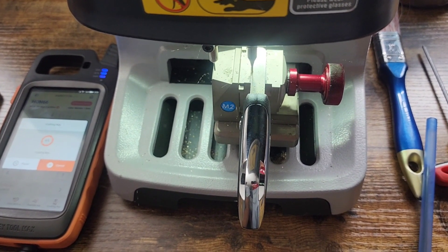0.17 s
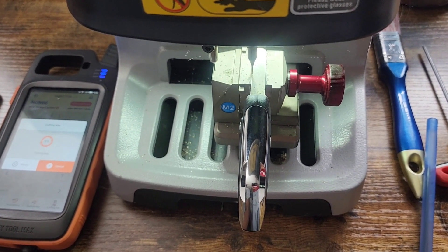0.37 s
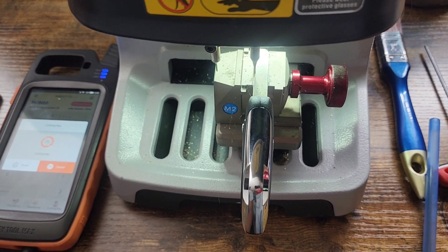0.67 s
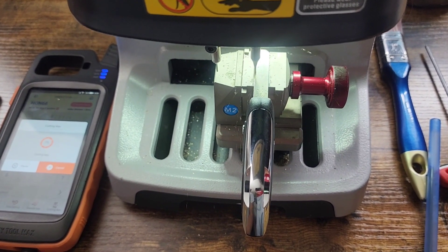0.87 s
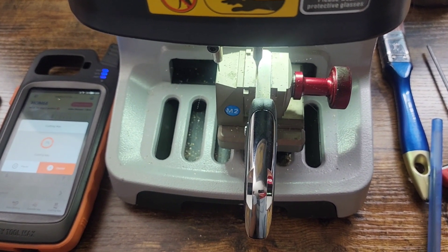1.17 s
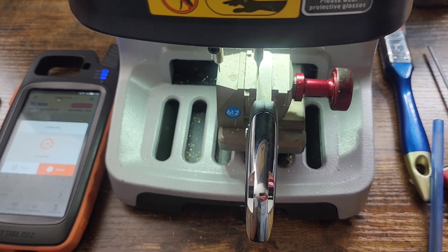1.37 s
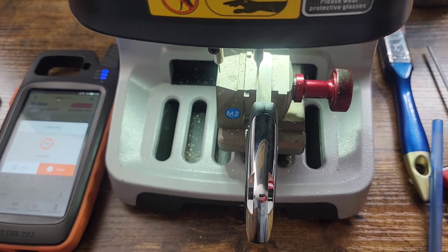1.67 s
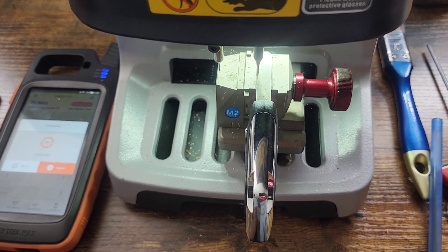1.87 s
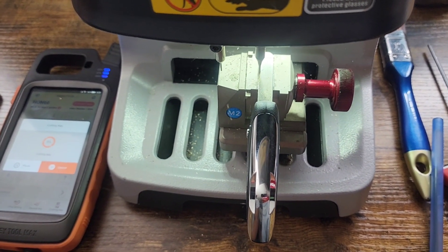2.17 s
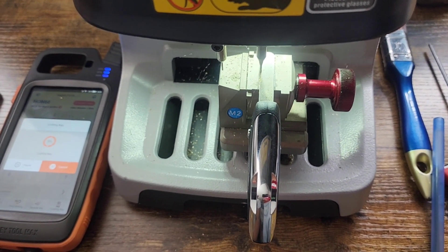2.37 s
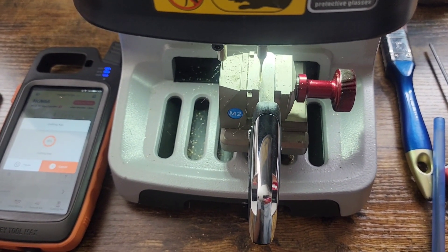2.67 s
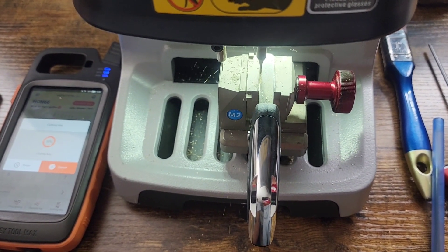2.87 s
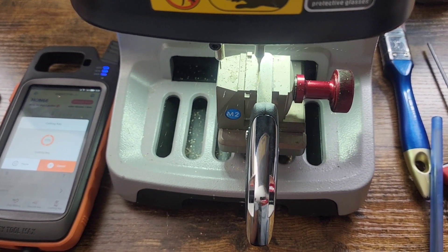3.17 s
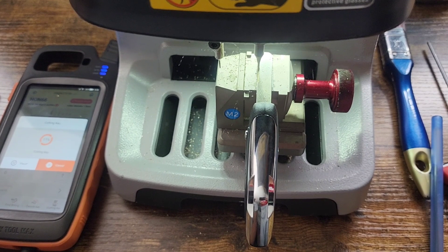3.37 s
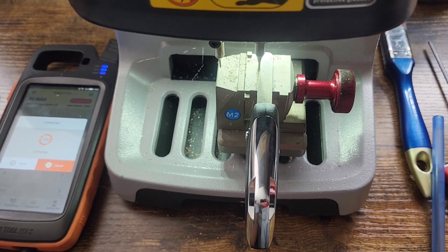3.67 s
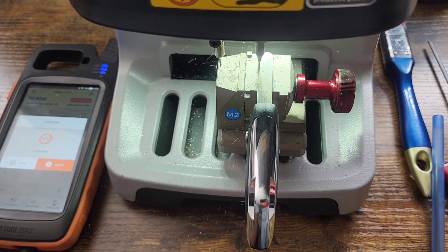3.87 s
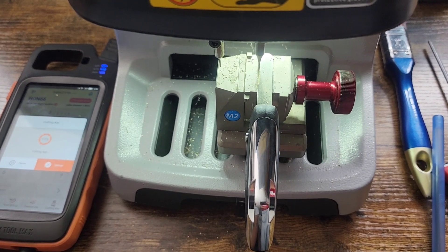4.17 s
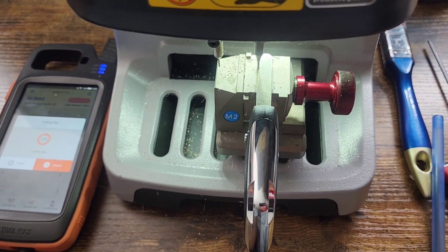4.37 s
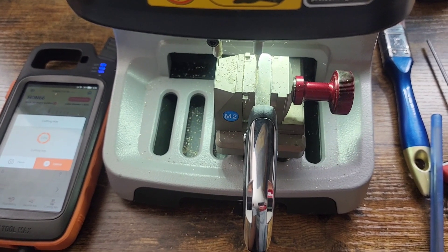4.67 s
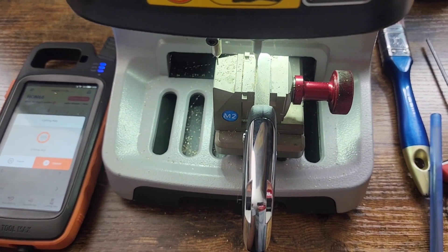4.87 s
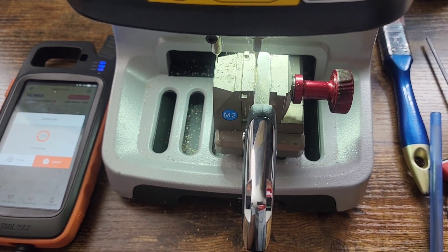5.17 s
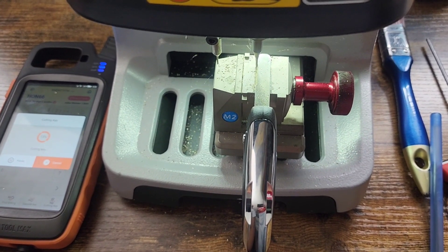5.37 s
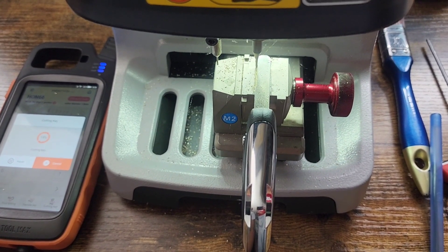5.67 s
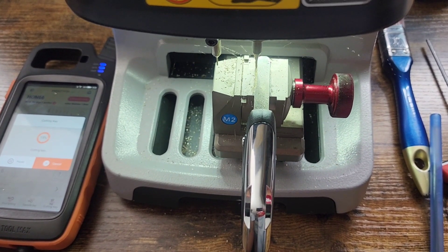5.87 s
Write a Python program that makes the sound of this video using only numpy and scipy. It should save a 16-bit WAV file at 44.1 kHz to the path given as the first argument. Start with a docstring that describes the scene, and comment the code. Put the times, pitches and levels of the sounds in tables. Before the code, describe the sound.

A small key cutting machine runs close by on a desk indoors. Its spindle hums steadily over a low rumble, with rattling bearings, a faint motor buzz and the gritty scrape of a cutter on a metal blank. A thin high whine soon rises. Near the middle the main tone drops out for an instant and the blank rings briefly, then the cutting carries on, easing before it bites again.

```python
"""A small key cutting machine mills a metal blank on a desk, heard from close by.
From the start the spindle hums at about 200 turns a second, its bearings rattle, the carriage motor
buzzes and three flutes scrape off chips. At 0.75 s the thin whine of the drive comes up, and the cut
then deepens. Near 2.75 s the flutes lose grip: their tone drops out, and the blank rings as they catch.
Around 5 s the drive runs almost free, before the cutter bites again."""
import sys
import numpy as np
from scipy.fft import rfft, irfft, next_fast_len
from scipy.io import wavfile
from scipy.ndimage import map_coordinates

SR = 44100
rng = np.random.default_rng(int(sys.argv[2]) if len(sys.argv) > 2 else 0)


def digitize_waveform(pressure):
    """Quantize a signal to 16-bit integers and store it at the path in sys.argv[1].

    Rows of a 2-D input are taken as channels; values are limited to [-1, 1].
    """
    field = np.atleast_2d(pressure).T
    bounded = np.clip(field, -1, 1)
    quanta = np.round(bounded * 32767).astype(np.int16)
    wavfile.write(sys.argv[1], SR, quanta)


N = 265790
TIME = np.arange(N) / SR
FLUTES = 3
SLIP_S, SLIP_WIDTH_S = 2.747, .024  # the flutes lose their grip


def amp(db):
    """Amplitude ratio of a level in decibels."""
    return 10 ** (np.asarray(db) / 20)


def unit(x):
    """Normalisation to an rms of 1."""
    return x / np.sqrt(np.mean(x ** 2) + 1e-20)


def curve(rows):
    """Linear interpolation of (time, value) rows, one value per sample."""
    return np.interp(TIME, *np.transpose(rows))


def bump(centre_s, width_s):
    """Gaussian pulse of height 1."""
    return np.exp(-((TIME - centre_s) / width_s) ** 2)


def wobble(rate_hz):
    """Slow random modulation: a spline through rate_hz Gaussian knots a second."""
    knots = rng.standard_normal(int(N * rate_hz / SR) + 4)
    coarse_s = TIME[::32]
    return np.interp(TIME, coarse_s, map_coordinates(knots, [coarse_s * rate_hz]))


def angle(hz):
    """Phase as the time integral of frequency."""
    return 2 * np.pi * np.cumsum(hz) / SR


def filtered(x, response):
    """Linear filtering: the spectrum is multiplied by a frequency response."""
    size = next_fast_len(N + SR // 4)
    return irfft(rfft(x, size) * response(np.fft.rfftfreq(size, 1 / SR)), size)[..., :N]


def tone(phase, left_db, right_db, correlation=.85):
    """Interference: reflections from the desk put a partial out of step in the two channels."""
    offset = np.arccos(np.clip(correlation, -1, 1)) / 2
    phase = phase + rng.uniform(0, 2 * np.pi) + np.array([[offset], [-offset]])
    return np.sqrt(2) * amp([[left_db], [right_db]]) * np.sin(phase)


def slipping_tone(phase, left_db, right_db, slip_rad, flutter_db):
    """Random phase and amplitude modulation: the tone of a slipping source wanders and flutters."""
    flutter = unit(amp(flutter_db * (.45 * wobble(7) + wobble(45))))
    wander = slip_rad * (wobble(9) + .5 * wobble(55))
    return flutter * tone(phase + wander, left_db, right_db)


def noise_band(spectrum, low_hz, high_hz, coherent_hz):
    """Partial coherence: band-limited noise whose two channels are alike below coherent_hz."""
    knots_hz, *channels_db = np.transpose(spectrum)

    def mid_and_side(hz):
        spread = np.pi / 4 * (1 - 1 / (1 + (hz / coherent_hz) ** 2))
        return np.array([np.cos(spread), np.sin(spread)])

    def colour(hz):
        density = amp([np.interp(np.log(hz + 1), np.log(knots_hz), db) for db in channels_db])
        high_pass = (1 + (low_hz / (hz + 1)) ** 12) ** -.5
        low_pass = (1 + (hz / high_hz) ** 12) ** -.5
        return density * high_pass * low_pass

    mid, side = filtered(rng.standard_normal((2, N)), mid_and_side)
    return np.sqrt(SR / 2) * filtered(np.array([mid + side, mid - side]), colour)


# Overtones of the carriage motor: harmonic_number, left_db, right_db
STEP_HARMONICS = [(3, -63, -59), (4, -66, -58), (5, -63, -50), (6, -73, -67), (7, -78, -64), (8, -82, -72)]
def carriage_motor(step_hz=926):
    """Periodic stepping: the motor buzzes faintly at harmonics of its step rate."""
    return sum(slipping_tone(2 * np.pi * k * step_hz * TIME, left_db, right_db, slip_rad=.3, flutter_db=1.5)
               for k, left_db, right_db in STEP_HARMONICS)


# Resonances of the frame on the desk: centre_hz, width_hz, relative_db
FRAME_MODES = [(54.6, 6.3, -47.5), (166.7, 6, -58), (226, 6, -46.5), (242.6, 12, -52), (268, 20, -46.5)]
def frame(load, drone_hz=111):
    """Forced vibration: the feed shakes the frame's low modes; one drones and swells in the deepest cut."""
    shake = np.zeros(N)
    for hz, width_hz, db in FRAME_MODES:
        envelope = wobble(width_hz) + 1j * wobble(width_hz)
        shake += amp(db) * unit(np.real(envelope * np.exp(2j * np.pi * hz * TIME)))
    drone_db = -48 - 3.5 * load + 5 * bump(3.77, .49) + 2 * wobble(8.7)
    drone = unit(np.sin(2 * np.pi * drone_hz * TIME + .99 * wobble(14)))
    return amp(-1.5) * shake + amp(drone_db) * drone


# Spectral density of the housing's rumble: frequency_hz, left_relative_db, right_relative_db
RUMBLE_SPECTRUM = [(19.9, -90, -93), (40, -77.5, -84), (81, -64.5, -67.5), (155, -84.5, -67),
                   (219, -60, -61), (260, -61.5, -75), (322, -63, -63.5), (361, -75, -69.5),
                   (617, -60, -81), (754, -78, -69.5), (1120, -79.5, -71)]
def housing():
    """Random vibration: the housing radiates a low band of noise."""
    return amp(-1.5) * noise_band(RUMBLE_SPECTRUM, low_hz=22.1, high_hz=1060, coherent_hz=520)


def drive(load, free_hz=4958, climb_hz=109, casing_hz=5030, half_width_hz=46):
    """Band-pass transmission: the whine climbs with load and passes the casing best in one narrow band."""
    pitch_hz = free_hz + climb_hz * load + wobble(20)
    off_band = 1 - 1 / (1 + ((pitch_hz - casing_hz) / half_width_hz) ** 6)
    soft_start = .5 - .5 * np.tanh((TIME - .75) / .033)
    gain_db = -14 * off_band - 5.5 * soft_start + .4 * wobble(30)
    return amp(gain_db) * tone(angle(pitch_hz), left_db=-52.5, right_db=-33, correlation=0)


# Bearing tones: shaft_multiple, left_db, right_db, full_bite_change_db, slip_rad
BEARING_TONES = [(1.496, -42.5, -45.5, 0, 0.69), (2.42, -61, -51, -3, 0.66), (2.532, -50.5, -45, -17, 0.55),
                 (3.54, -43.5, -44.5, -8.5, 1.3), (4.168, -58, -69, 3.5, 0.88), (4.54, -51.5, -67, 1, 1.25),
                 (5.54, -53.5, -47, -8.5, 1.1), (6.51, -57, -51, -13, 0.62), (7.52, -57, -62, -15, 0.44),
                 (12.56, -48, -48.5, -2.5, 1.17), (12.82, -52.5, -55, 0.5, 1.55),
                 (12.94, -53, -51.5, -7, 1.43), (13.65, -59, -58, 2.5, 0.91), (18.87, -57, -48, 3, 0.28),
                 (31.9, -72, -58, 4.5, 0.92)]
def bearing_rattle(shaft, bite):
    """Inharmonic partials: the balls roll and slip at non-integer multiples of the shaft rate."""
    return sum(amp(bite_db * bite) * slipping_tone(k * shaft, left_db, right_db, slip, flutter_db=2.5 * slip)
               for k, left_db, right_db, bite_db, slip in BEARING_TONES)


# Bouts in which one bearing tone sings out: start_s, length_s, relative_db
SINGING_BOUTS = [(0.049, 0.096, -49), (0.406, 0.169, -50), (0.743, 0.39, -49), (1.538, 0.3, -47.5),
                 (2.17, 0.169, -47.5), (2.485, 0.25, -49), (2.948, 0.83, -50), (3.84, 0.23, -49.5),
                 (4.19, 0.087, -48), (4.451, 0.127, -48), (4.784, 0.129, -49), (5.016, 0.45, -52.5),
                 (5.602, 0.086, -48)]
def bearing_song(shaft, shaft_multiple=10.56, edge_s=.1):
    """Amplitude modulation: one bearing tone rises in bouts above a quiet floor."""
    bouts = np.zeros(N)
    for start_s, length_s, db in SINGING_BOUTS:
        inside_s = np.minimum(TIME - start_s, start_s + length_s - TIME)
        bouts += amp(db + 3.5) * np.clip(.5 + inside_s / edge_s, 0, 1)
    envelope = np.maximum(bouts, amp(-51))
    return envelope * slipping_tone(shaft_multiple * shaft, 1, -1.7, slip_rad=.45, flutter_db=1.45)


def blank(pitch_hz=820, peak_db=-41):
    """Transient excitation: the clamped key rings briefly as the flutes catch it again."""
    return bump(2.78, .02) * tone(2 * np.pi * pitch_hz * TIME, peak_db, peak_db)


# Metallic partials of the cutter: shaft_multiple, left_relative_db, right_relative_db, full_load_change_db
RING_PARTIALS = [(42.3, -53, -56.5, -12), (57, -64, -62.5, -1.5), (69.2, -58, -71, 3),
                 (72, -50.5, -68, -2.5), (74, -60, -72, -2), (75, -61, -72, -1)]
def cutter_ring(shaft, load, blur_rad=.93):
    """Line broadening: random phase modulation blurs the high partials of the ringing steel."""
    ring = np.zeros((2, N))
    for k, left_db, right_db, load_db in RING_PARTIALS:
        blur = blur_rad * (wobble(30) + .5 * wobble(160))
        ring += amp(load_db * load) * tone(k * shaft + blur, left_db, right_db, correlation=0)
    return ring


# Spectral density of the scraping: frequency_hz, left_relative_db, right_relative_db
SCRAPE_SPECTRUM = [(1300, -75, -80), (2300, -78.5, -75), (2500, -72, -75), (2870, -90, -76),
                   (3110, -77.5, -70), (3600, -82, -78.5), (4320, -83, -68), (5320, -80.5, -76),
                   (5900, -86.5, -78.5), (8350, -92.5, -88.5), (8950, -85, -87.5), (11700, -96.5, -99),
                   (13740, -81, -92), (15200, -81, -100)]
def cutter(shaft, load, grip_loss, runout=.12, flute_depth=.096):
    """Modulated friction noise: it swells at each flute, and once a turn as the cutter runs off centre."""
    contact = np.exp(runout * np.cos(shaft) + flute_depth * np.cos(FLUTES * shaft))

    def chips():
        grit_db = .7 * wobble(300) + .6 * wobble(35)
        return unit(contact * amp(grit_db))

    scrape = noise_band(SCRAPE_SPECTRUM, low_hz=1080, high_hz=12000, coherent_hz=500)
    hiss = noise_band(SCRAPE_SPECTRUM, low_hz=12100, high_hz=16000, coherent_hz=500)
    hiss *= amp(.3 - 2.6 * load)  # the steel hisses most freely under light load
    ring = cutter_ring(shaft, load)
    scrape_envelope = amp(-3.5 * grip_loss) * chips()
    steel_envelope = amp(-5 * grip_loss) * unit(chips() * contact)
    return scrape_envelope * scrape + steel_envelope * (hiss + ring)


# Shaft harmonics: harmonic_number, left_db, right_db, full_bite_change_db, full_load_change_db, correlation
SHAFT_HARMONICS = [(1, -32.5, -33.0, -4.0, 1.0, 1.0), (2, -42.3, -36.8, -1.0, -2.0, 0.8),
                   (3, -22.0, -27.0, -0.0, 0.0, 1.0), (4, -44.0, -53.5, -7.0, 7.0, 0.9),
                   (5, -39.5, -45.5, -2.0, -3.0, -0.6), (6, -55.0, -54.0, -0.0, -5.0, -0.4),
                   (7, -52.0, -55.0, -5.0, 7.0, 0.7), (8, -57.0, -48.0, -8.0, 0.0, -0.4),
                   (9, -56.5, -51.0, 3.0, 2.0, 0.9), (10, -62.0, -50.5, -1.0, -1.0, -0.7),
                   (11, -57.0, -54.5, -4.0, -0.0, -0.5), (12, -49.5, -58.0, 5.0, -6.0, 1.0),
                   (13, -54.0, -51.0, -6.0, -3.0, 0.6), (14, -61.0, -54.0, -0.0, 3.0, -1.0),
                   (15, -50.5, -49.5, 4.0, -3.0, -1.0), (16, -60.0, -49.0, -6.0, -3.0, 0.5),
                   (18, -66.0, -53.0, 4.0, -0.0, -1.0), (20, -72.5, -53.0, -1.0, -1.0, 0.7),
                   (21, -62.0, -55.5, 5.0, -4.0, 0.9), (22, -65.0, -49.0, -1.0, -0.0, -0.1),
                   (23, -74.0, -54.0, 6.0, 9.0, 0.6), (51, -56.0, -61.0, -6.0, 1.0, 0.0)]
# Slow swell of the flute tone: time_s, gain_db
FLUTE_GAIN = [(0, 0.9), (1.75, 1), (1.9, 0), (4.1, -0.65), (4.5, 0.3), (6, -0.1)]
def spindle(shaft, bite, load, grip_loss):
    """Harmonic series of a rotor: the flute-passing tone leads; bite and load rebalance the others."""
    hum = np.zeros((2, N))
    for k, left_db, right_db, bite_db, load_db, correlation in SHAFT_HARMONICS:
        if k == FLUTES:
            regrip = bump(2.805, .035)  # overshoot as the cutter grips again
            gain_db = curve(FLUTE_GAIN) - 11 * grip_loss + 2 * regrip + .28 * wobble(30)
            jitter_rad = .021 * wobble(40)
        else:
            flutter_db = 1.45 * (.5 * wobble(3.06) + wobble(35)) * min(1, k / 6)
            gain_db = bite_db * bite + load_db * load + flutter_db
            jitter_rad = .06 * np.sqrt(k) * wobble(35)
        if k == 1:  # the shaft swings wider while it runs free
            gain_db += 4 * bump(SLIP_S, 3 * SLIP_WIDTH_S)
        hum += amp(gain_db) * tone(k * shaft + jitter_rad, left_db, right_db, correlation)
    return hum


# How hard the drive works: time_s, load_fraction
WORKLOAD = [(0, .43), (.6, .52), (1.15, .85), (1.9, .83), (2.3, 1), (3.25, 1), (3.6, .83), (3.85, .4),
            (4.35, .5), (4.95, .03), (5.45, .03), (5.6, .33), (5.75, .42), (6, 1)]
def drive_load(relief_s=2.72, fall_s=.08, load_shed=.66):
    """Transient unloading: the load falls quickly when the flutes slip, then builds up again."""
    elapsed = np.maximum(TIME - relief_s, 0) / fall_s
    relief = (elapsed * np.exp(1 - elapsed)) ** 2
    return curve(WORKLOAD) - load_shed * relief


# Depth of the cut: time_s, bite_fraction
CUT_DEPTH = [(0, 0.24), (.5, 0.07), (1.5, 0.42), (2, .3), (2.6, 1), (4.6, 1), (5.4, 0.37), (5.7, 0.4),
             (6, 0.85)]
def scene(free_turn_hz=199.75, sag_hz=1.35):
    """Superposition of all sources; spindle, bearings and cutter share one shaft, which the load slows."""
    load, bite = drive_load(), curve(CUT_DEPTH)
    grip_loss = bump(SLIP_S, SLIP_WIDTH_S)
    shaft = angle(free_turn_hz - sag_hz * load)
    hum = spindle(shaft, bite, load, grip_loss)
    rattle = bearing_rattle(shaft, bite) + bearing_song(shaft)
    rumble = housing()
    cutting = cutter(shaft, load, grip_loss)
    feed = carriage_motor() + frame(load)
    return hum + rattle + rumble + cutting + feed + blank() + drive(load)


def record(dry, cutoff_hz=15350):
    """Band limiting: an ideal low-pass filter removes everything above the cutoff."""
    return filtered(dry, lambda hz: hz < cutoff_hz)


dry = scene()
out = record(dry)
digitize_waveform(out)
```